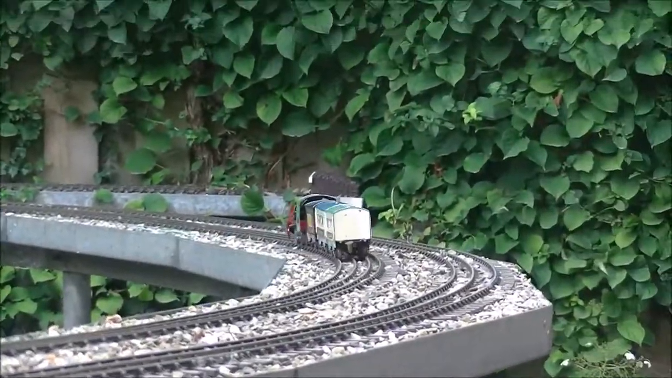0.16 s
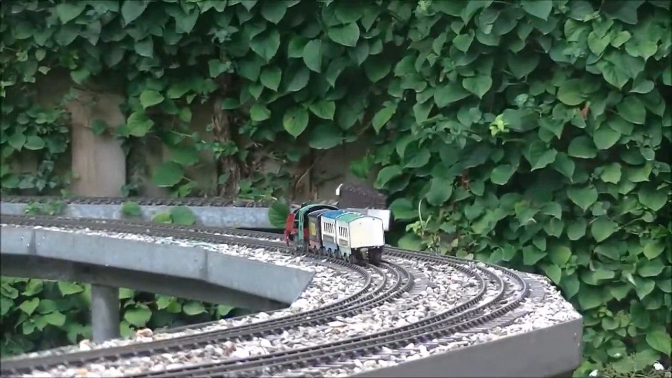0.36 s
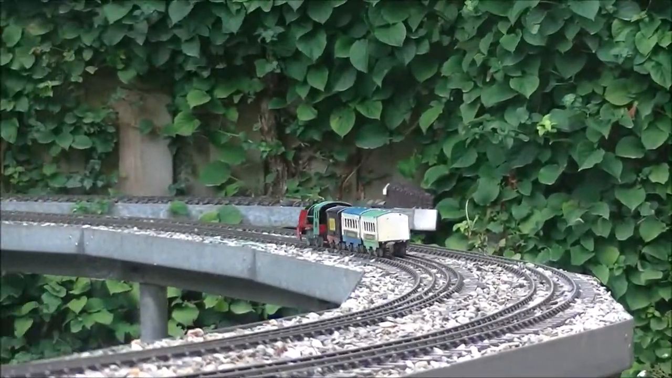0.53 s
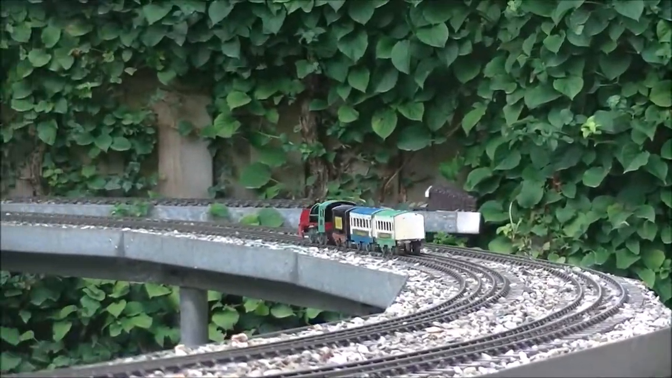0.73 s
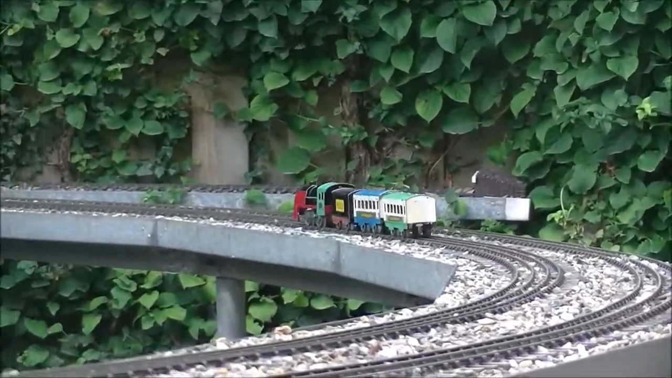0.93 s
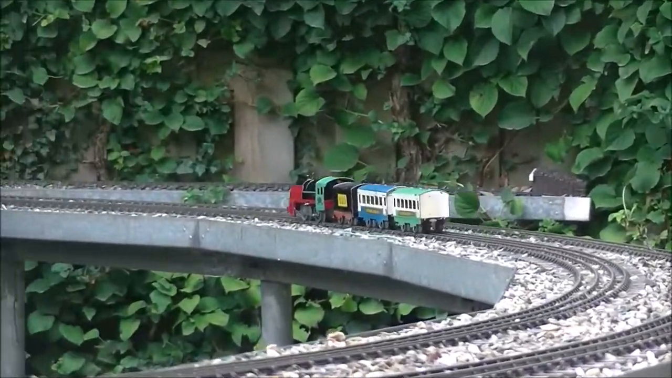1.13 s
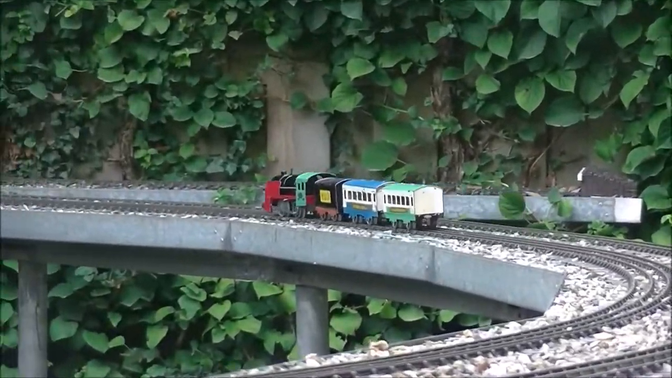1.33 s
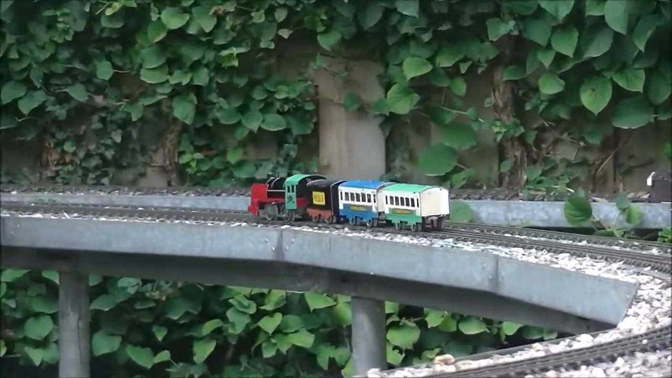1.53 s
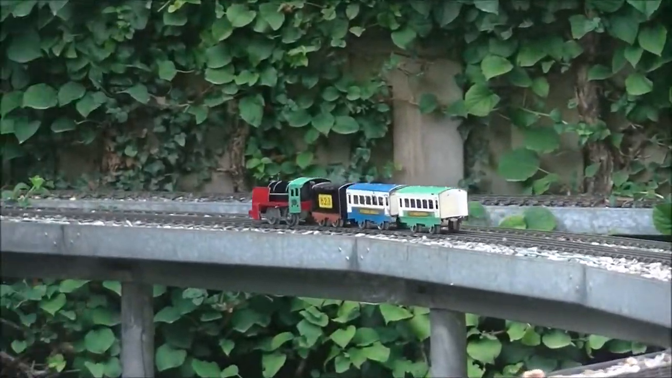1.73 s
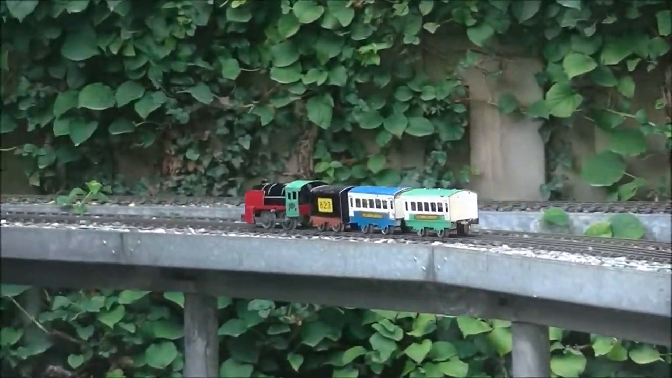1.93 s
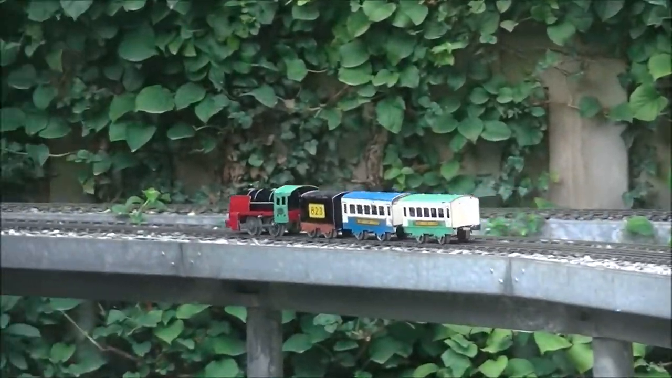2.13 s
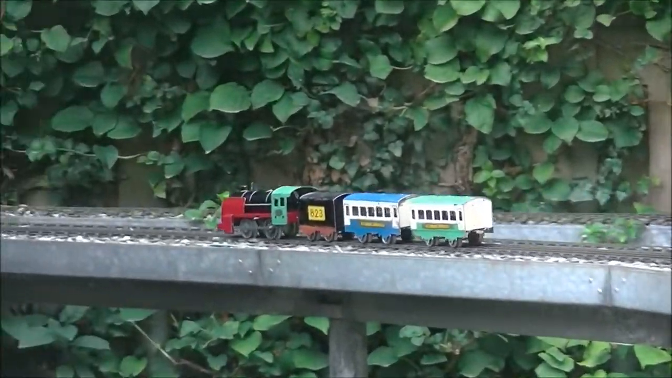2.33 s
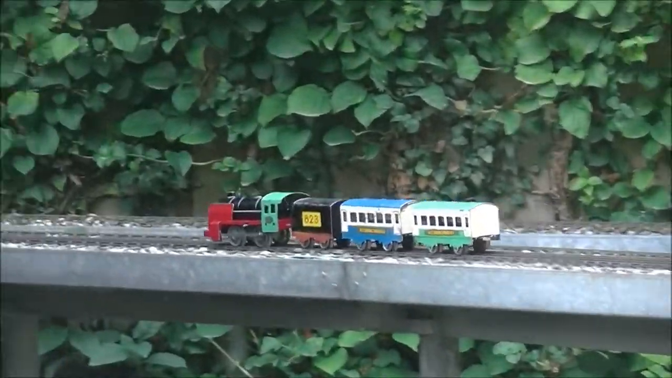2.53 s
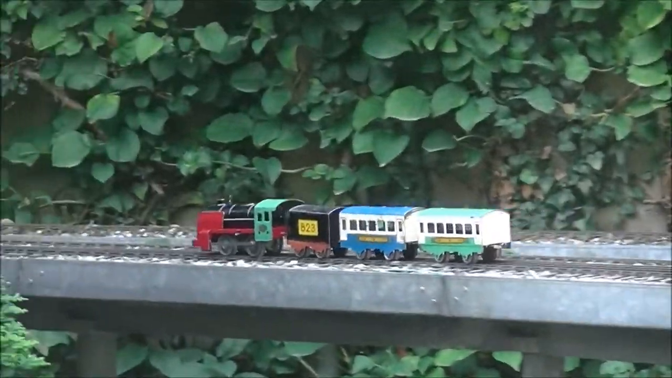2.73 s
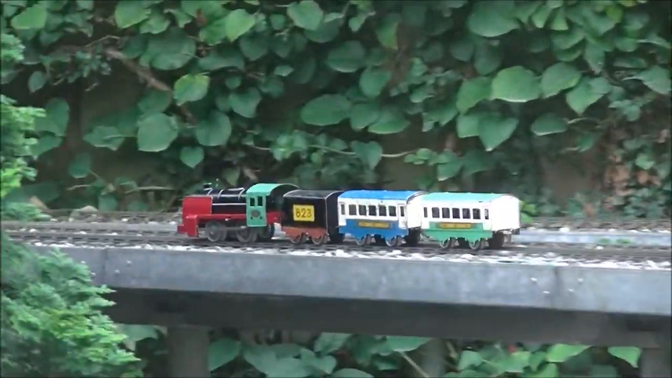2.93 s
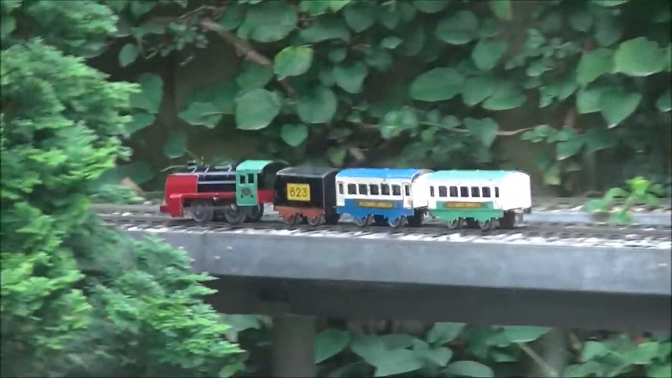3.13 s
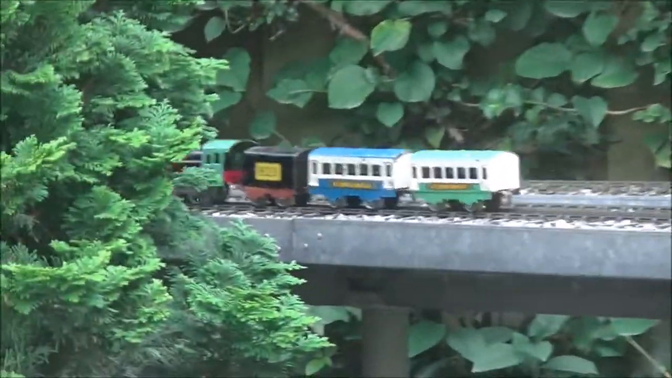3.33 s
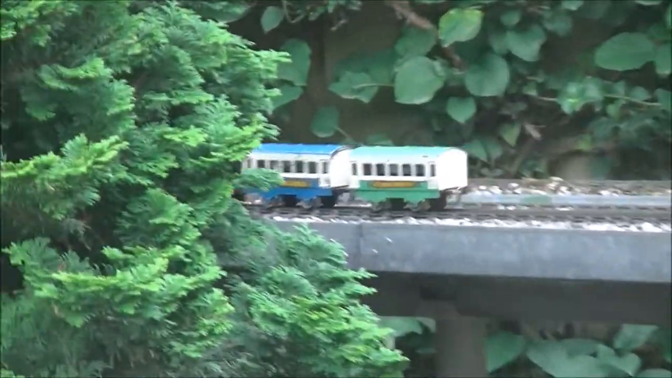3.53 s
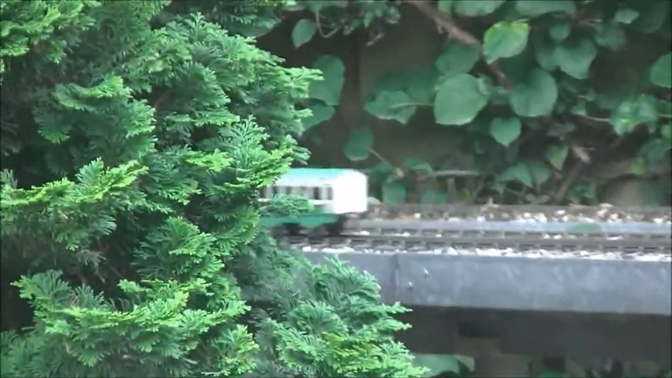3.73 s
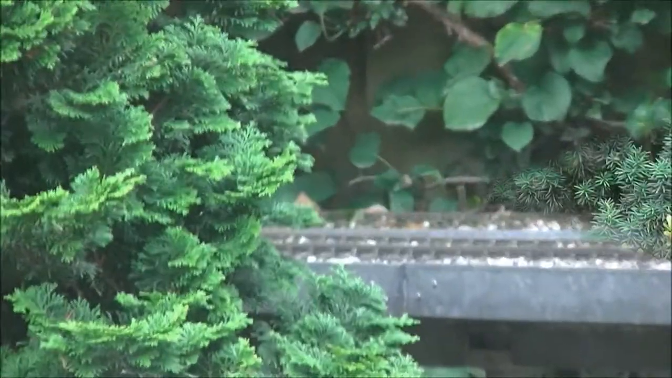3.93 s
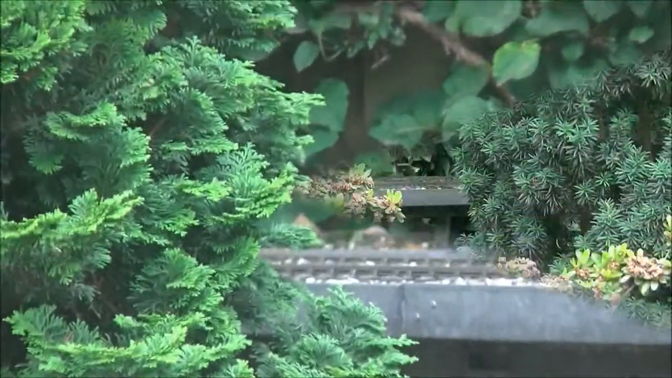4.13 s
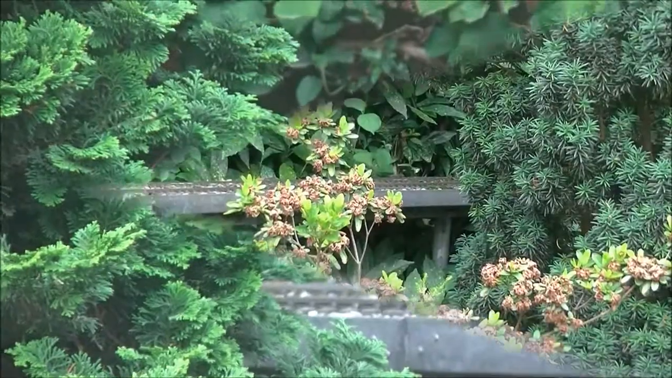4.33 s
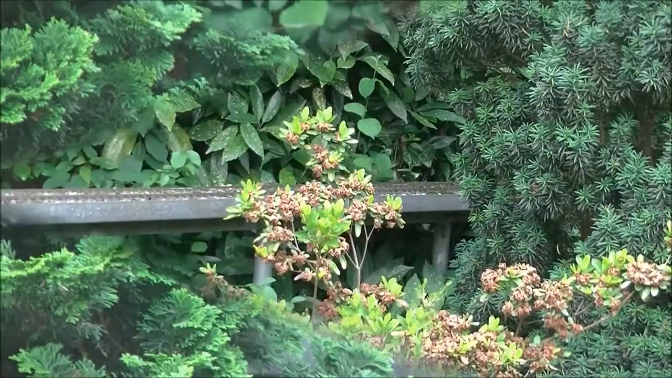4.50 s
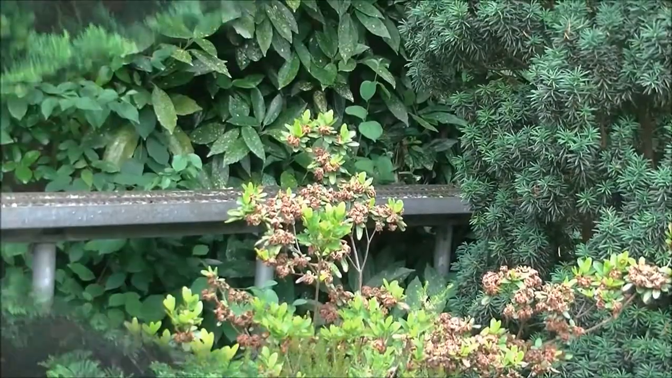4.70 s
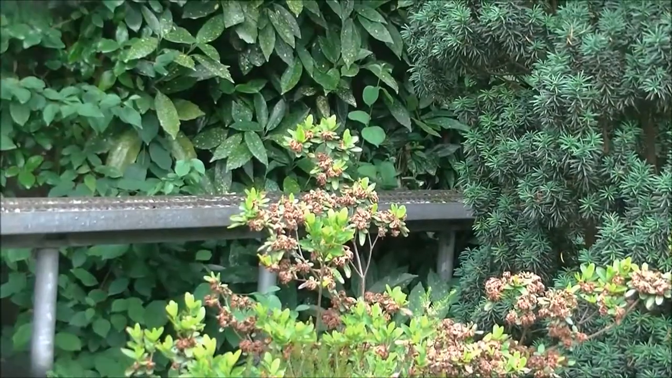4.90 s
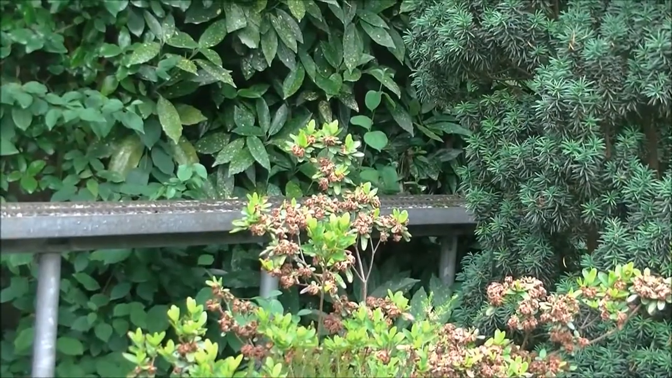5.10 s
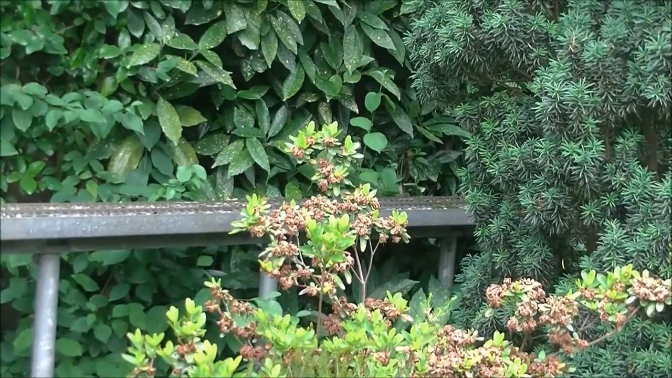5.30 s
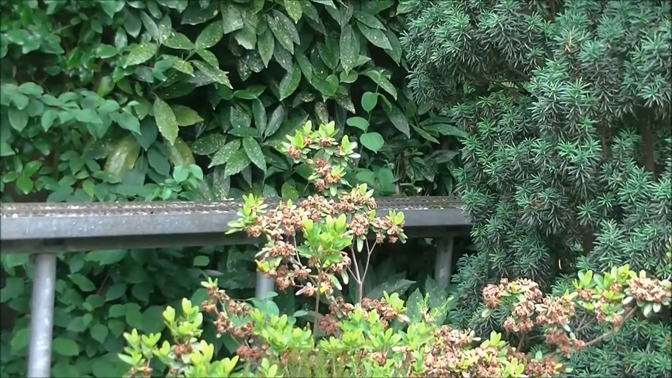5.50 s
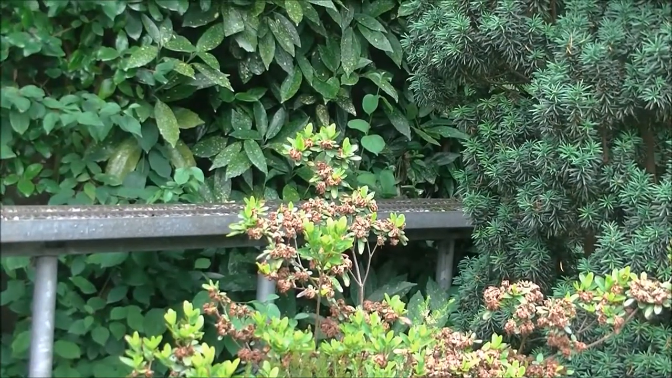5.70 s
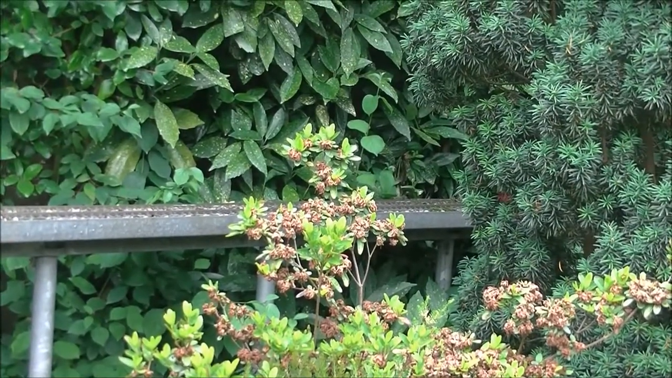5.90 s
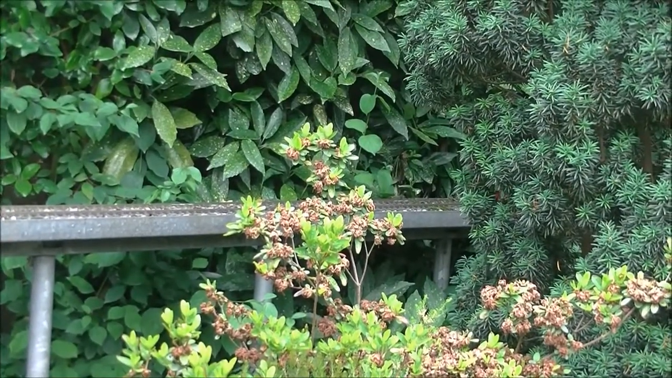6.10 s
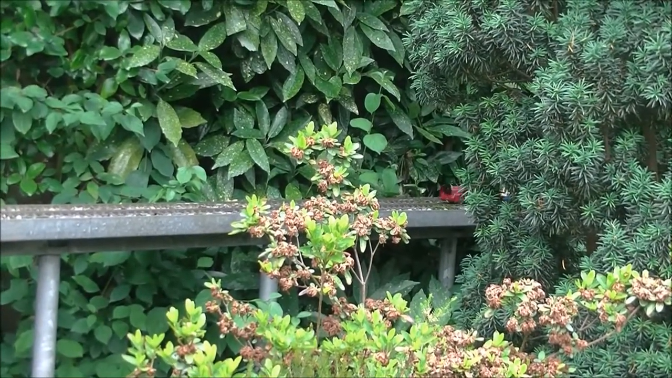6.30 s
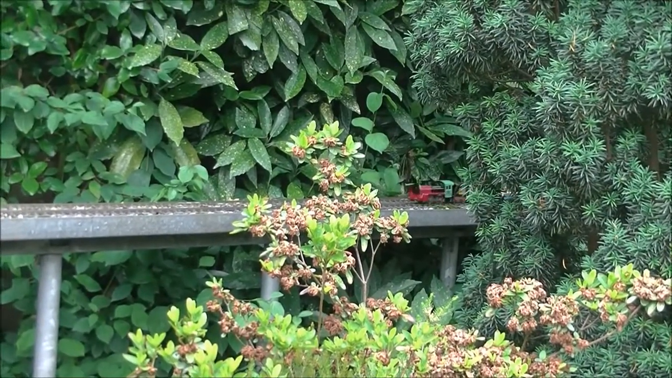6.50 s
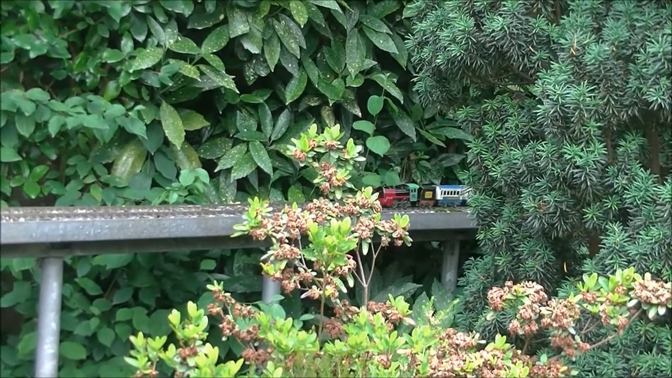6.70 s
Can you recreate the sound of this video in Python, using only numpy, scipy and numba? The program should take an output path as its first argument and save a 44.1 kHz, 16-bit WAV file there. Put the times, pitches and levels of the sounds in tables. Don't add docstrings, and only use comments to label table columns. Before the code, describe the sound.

From the start, a wind-up tin train rattles steadily a few metres away outdoors: a dense, sizzling metallic whirr of tiny gear and wheel contacts, with jingling loose parts and shifting tinny resonances as it turns. The rapid gear throb slows slightly while the level eases only a little. Wheels tick over rail joints, more clearly around 0.6, 1.6 and 3.1 seconds. A small handling knock comes near 3.8, and further ticks near 4.4 and 4.6. At about 4.75 the scene cuts abruptly: the train is much quieter, duller and slower behind shrubs. It swells gradually and its gears quicken; ticks cluster from 5.0 to 5.5, then a strong sharp click lands at 5.65, with smaller ones following. It is still approaching at the end, about 6.7. Beneath everything lie faint low traffic hum, air rumble, soft leaf rustle and barely audible dull hand thumps.

```python
import sys
import numpy as np
from scipy import signal
from scipy.fft import rfft, irfft, next_fast_len
from scipy.io import wavfile
from scipy.ndimage import uniform_filter1d
from numba import njit

SR = 44100
rng = np.random.default_rng(int(sys.argv[2]) if len(sys.argv) > 2 else 0)


def log_audio(samples):
    frames = np.atleast_2d(samples).T
    limited = np.clip(frames, -1, 1)
    pcm = np.round(limited * 32767).astype(np.int16)
    wavfile.write(sys.argv[1], SR, pcm)


def elevation(decibels):
    levels = np.asarray(decibels, float)
    return 10 ** (levels / 20)


N = 297675
T = np.arange(N) / SR
SIZE = next_fast_len(N + 4096)
HZ = np.arange(SIZE // 2 + 1) * SR / SIZE + 1e-3
CUT_S = 4.746

# time in seconds, level of the tin body in dB, brightness in dB.
RUN = [
    [(0, -38, -10.5), (.35, -38.5, -11.5), (.8, -40, -9.5), (1.3, -41, -9), (2, -41, -8.5), (2.6, -41, -7),
     (3.15, -41, -7), (3.55, -42.5, -8), (4.3, -42, -9), (4.76, -42, -10)],
    [(4.76, -53.5, -12.5), (4.95, -51.5, -12.5), (5.13, -49, -13.5), (5.4, -49, -13), (5.6, -46.5, -11),
     (5.85, -45, -10), (6.35, -43, -10.5), (6.75, -41.5, -10)],
]
# time in seconds, teeth per second in Hz.
GEAR_TEETH = [
    [(0, 149), (1.3, 141), (2.3, 130.5), (3, 132), (3.6, 124), (4.75, 118)],
    [(4.75, 76), (5.5, 87), (5.85, 98), (6.1, 104), (6.75, 106)],
]
ZONE_HZ = [3100, 6600, 10300]
# level against the body in dB, share of the brightness, gear tooth throb in dB.
ZONES = [
    [(-5, 0.019, 0.074), (0.5, 0.032, 0.24), (1.5, 1.06, 0.43), (-6.5, 1.06, 0.84)],
    [(-9, -0.31, .1), (1.5, -0.048, 0.27), (-0.5, 0.93, 0.72), (-5.5, 1, 1.3)],
]
# pitch in Hz, level in dB per Hz.
NEAR_COLOUR = [(290, -34), (500, -14.5), (1330, -8.5), (1490, -10), (1940, -4.5), (2110, -7), (2620, -5.5),
               (3120, -4.5), (3760, 1), (5010, 2), (5960, -0.5), (6880, -15.5), (7720, -11.5),
               (9050, -13.5), (15600, -26)]
HIDDEN_COLOUR = [(290, -49), (500, -26), (1430, -9.5), (1880, -8.5), (2110, -9.5), (2740, -6),
                 (3210, -16.5), (3500, -12.5), (4280, -13.5), (4870, -11.5), (6590, -21.5), (7950, -11.5),
                 (9590, -16.5), (12300, -14.5), (15600, -22)]
# pitch in Hz, level in dB per Hz.
NEAR_ECHO = [(350, -47), (600, -36), (1090, -40), (1440, -14.5), (1790, -16.5), (2660, -5.5), (2960, -6.5),
             (3350, -1.5), (4110, -7), (5550, 4.5), (7000, -5), (9450, -10), (10500, -15), (11800, -15),
             (15600, -16)]
HIDDEN_ECHO = [(350, -53), (600, -97), (1080, -82), (1480, -21), (1560, -16), (1910, -12), (2690, -13),
               (3090, -9.5), (4110, -21), (6020, -10.5), (7290, -11), (11000, -11), (12200, -14),
               (13700, -7), (15600, -23)]
ECHO_DB = [-9.5, -9.5]
# time in seconds, tick peak in dB, lift of the clatter that follows in dB.
JOINTS = [(0.2665, -31, 6), (0.598, -20, 2), (1.0864, -36, 0), (1.576, -17, -3), (1.8233, -31, 3.5),
          (2.2054, -26, 4), (3.1213, -19, 4), (3.2625, -23, -1), (3.3598, -30, -1), (4.4019, -29, 2),
          (4.5925, -30, -2), (4.6133, -29, 4), (5.012, -29, 5), (5.1173, -36, 4), (5.2175, -33, 6),
          (5.2634, -37, 4), (5.3612, -28, 3), (5.45, -18, -1), (5.4959, -22, 0), (5.6535, -6, 1),
          (5.675, -20, 5), (5.8022, -25, 8), (5.9708, -32, 1), (6.0477, -31, 0), (6.0963, -28, 4.5),
          (6.1275, -42.5, 3), (6.4497, -29, 1), (6.6427, -36, 5.5)]
# pitch in Hz,
# width in Hz, lift in dB, heading of a lobe in degrees, lobe spacing in degrees.
PANELS = [(770, 120, 4, 32, 96), (1203, 45, 9, 27, 49), (1340, 50, 8.5, 11, 48), (1592, 28, 11, 49, 54),
          (1700, 26, 8.5, -6, 100), (1890, 65, 6.5, 30, 50), (2010, 60, 4, 24, 48),
          (3720, 150, 3.9, 6, 76), (4050, 130, 3.4, -5, 52), (4000, 89, 1.3, 77, 79),
          (4860, 250, 4.5, 60, 160), (5190, 170, 5.1, -21, 162), (5800, 98, 1.9, 52, 57),
          (7600, 310, 5, -20, 140), (7850, 220, 3.1, 42, 130), (8970, 310, 3.8, 18, 81),
          (12150, 690, 6.5, 8, 120)]
ROOFS = [(2290, 60, 5, 21, 42), (2535, 75, 6, 44, 46), (2720, 90, 7, 43, 38)]
FRONT = [(830, 72, 4.1, 40, 14.3), (1633, 29, 8.5, 10, 27), (1650, 24, 8, -9, 78),
         (1923, 160, 9.5, 21, 200), (2720, 84, 3.2, 12, 22), (3830, 170, 2.2, 28, 110),
         (4890, 330, 5.8, 26, 150), (5350, 250, 3.9, 33, 92), (7900, 380, 3.4, 35, 100),
         (12100, 500, 3.4, 12, 83), (12000, 540, 5.1, 38, 60)]
# time in seconds, pitch in Hz, length in cycles, level in dB.
BUMPS = [(.67, 40, 1, -66), (1.13, 45, 1, -62), (1.85, 60, 1.5, -56), (3.63, 60, 1, -62),
         (3.7587, 1100, 1, -31), (3.7572, 2100, 0.97, -34), (3.759, 260, 0.51, -41),
         (3.851, 51.7, 1.5, -54), (4.14, 80, 0.81, -52), (4.57, 70, 1, -58), (5.6, 55, 1, -62)]
# pitch in Hz, level in dB per Hz.
TOWN = [(12, -43), (20, -17), (80, -5), (123, -3.5), (156, -3), (206, 0), (228, -1), (275, -1.5),
        (394, -4.5), (492, -8.5), (743, -18.5), (1200, -29), (1560, -14), (2640, -120)]
# start in seconds, end in seconds, pitch in Hz, pitch wander in Hz, level in dB.
DRONES = [(.08, .24, 209, 2, -63), (.5, 1.25, 210, 3, -62), (1.4, 2.05, 210, 4, -69),
          (.2, 1.35, 246, 7, -66), (1.65, 2.2, 257, 3, -66), (.8, 3.2, 150, 1.5, -70),
          (3.4, 4.3, 212, 4, -70)]
# pitch in Hz, width in Hz, left minus right share.
PORTS = [(3240, 890, -0.19), (5300, 1500, -0.1), (6450, 940, 0.29), (9800, 690, -0.25), (11900, 1500, -0.2),
         (14200, 1200, .15)]


def train():
    ticks, clatter_db = joints()
    direct = contacts(5500, 1.8, 1.0) + 0.37 * loose_parts(900, 0.13, 2.8) + ticks
    scattered = contacts(6000, 2.1, 1.5) + 0.41 * loose_parts(500, .05, 4.9)
    tin = rfft(body(np.array([direct, scattered])), SIZE)
    lurch = .5 * walk(5.9)
    wheel_turn = 2 * np.pi * np.cumsum(11 + 1.5 * walk(3)) / SR
    wobble = .3 * walk(20) + .45 * np.sin(wheel_turn)
    out = np.zeros((2, N))
    for view, (mid, echo) in enumerate([(NEAR_COLOUR, NEAR_ECHO), (HIDDEN_COLOUR, HIDDEN_ECHO)]):
        seen = (T >= CUT_S) == view
        teeth = gear(view)
        level_db, bright_db = curve(RUN[view:view + 1])
        coloured = tin * np.array([shape(mid), elevation(ECHO_DB[view]) * shape(echo)])
        below = 0
        for edge, (db, share, throb_db) in zip(ZONE_HZ + [SR], ZONES[view]):
            low = 1 / (1 + (HZ / edge) ** 16)
            zone = irfft(coloured * (low - below), SIZE)[:, :N]
            slow = np.sqrt(uniform_filter1d(zone[0] ** 2, SR // 7))
            flutter = 0.16 * walk(23.82) + 0.31 * walk(7.6)
            flutter += wobble + lurch + clatter_db + throb_db * teeth
            out += seen * zone / slow * elevation(level_db + db + share * bright_db + flutter)
            below = low
    return out


def contacts(per_s, scatter_db, bed):
    chance = rng.random((3, N))
    size_db = np.minimum(-scatter_db * np.log(chance[2] + 1e-9), 6.5)
    hits = (chance[0] < per_s / SR) * np.sign(chance[1] - .5) * elevation(size_db)
    return unit(unit(hits) + bed * rng.standard_normal(N))


def loose_parts(per_s, t60_s, scatter_db):
    chance = rng.random((int(per_s * N / SR), 4)).T
    start = (chance[0] * N).astype(np.int64)
    hz = 800 + 15000 * chance[1]
    ring_n = t60_s * (.5 + chance[2]) * SR
    pole = np.exp(2j * np.pi * hz / SR - np.log(1000) / ring_n)
    size = elevation(np.minimum(-scatter_db * np.log(chance[3] + 1e-9), 10))
    return unit(pings(start, (ring_n / 2).astype(np.int64), pole, size))


@njit
def pings(start, length, pole, size):
    out = np.zeros(N)
    for k in range(len(start)):
        z = size[k] + 0j
        for i in range(start[k], min(start[k] + length[k], N)):
            out[i] += z.imag
            z *= pole[k]
    return out


def joints():
    ticks, clatter_db = np.zeros(N), np.zeros(N)
    body_db = curve(RUN)[0]
    for s, db, lift_db in JOINTS:
        i = int(s * SR)
        ticks[i] = elevation(db - body_db[i] - 17.0)
        clatter_db[i] = lift_db
    click = [0.84, -0.28, 0.53, -0.37, -0.46, 0.72, 0.15]
    fade = np.exp(-1 / (0.005 * SR))
    return np.convolve(ticks, click)[:N], signal.lfilter([1], [1, -fade], clatter_db)


def body(force):
    sound = force.copy()
    share = np.array([[1], [.6]])
    cut = int(CUT_S * SR)
    roofs_hidden = int(3.2 * SR)
    groups = [(PANELS, slice(None, cut)), (ROOFS, slice(None, roofs_hidden)), (FRONT, slice(cut, N))]
    for panels, seen in groups:
        heading = 20 * (T[seen] - T[seen][0])
        for hz, width, db, lobe, spacing in panels:
            beam = np.clip(.5 + 1.3 * np.cos(2 * np.pi * (heading - lobe) / spacing), 0, 1)
            sway = elevation(1.4 * walk(14)[seen])
            ringing = signal.lfilter(*signal.iirpeak(hz, hz / width, SR), force[:, seen])
            sound[:, seen] += share * (elevation(db) - 1) * beam * sway * ringing
    return sound


def gear(view):
    teeth_hz = curve(GEAR_TEETH[view:view + 1])[0] * (1 + .005 * walk(3))
    turn = 2 * np.pi * np.cumsum(teeth_hz) / SR
    return (np.cos(turn) + .7 * np.cos(2 * turn)) * elevation(3 * walk(2))


def hand():
    out = np.zeros(N)
    for s, hz, cycles, db in BUMPS:
        near = slice(int((s - .1) * SR), int((s + .1) * SR))
        turn = (T[near] - s) * hz
        swell = np.exp(-(turn / (0.5 * cycles)) ** 2)
        out[near] += elevation(db) * swell * np.cos(2 * np.pi * turn + 1.5)
    return out


def leaves():
    rustle = unit(through(rng.standard_normal((2, N)), ring(885, 880) ** 2))
    level_db = np.where(T < CUT_S, -64, -70) + 0.96 * walk(5.5)
    return rustle * elevation(level_db + np.array([[0], [-15.5]]))


def traffic(bass):
    level_db = np.where(T < CUT_S, -59.5, -62.5) - 3 * window(T, -1, 0.5, 0.28)
    spread = np.array([HZ ** 0, elevation(-10.0) * (1 + HZ / 1500)])
    wash = through(rng.standard_normal((2, N)), shape(TOWN) * (1 - bass) * spread)
    return wash / np.std(wash[0]) * elevation(level_db - 1.0 + 1.3 * walk(9))


def air(bass):
    level_db = np.where(T < CUT_S, -75.5, -82.5) + 4.8 * window(T, 3.4, 6.2, .4) + 3.4 * walk(4.8)
    rumble = unit(through(rng.standard_normal(N), shape(TOWN) * bass))
    return rumble * elevation(level_db - 1.5 + 4.0 * walk(19))


def drones():
    out = np.zeros(N)
    for start, stop, hz, wander_hz, db in DRONES:
        tone = np.sin(2 * np.pi * np.cumsum(hz + wander_hz * walk(5.4)) / SR)
        out += window(T, start, stop, 0.045) * elevation(db + 3.8 * walk(14)) * tone
    return out


def town():
    bass = 1 / (1 + (HZ / 95) ** 4)
    mid, side = traffic(bass) + leaves()
    return np.array([mid + air(bass) + drones(), side])


def unit(x):
    return x / np.sqrt(np.mean(x ** 2))


def shape(points):
    hz, db = np.transpose(points)
    return elevation(np.interp(np.log(HZ), np.log(hz), db))


def ring(hz, width):
    return 1 / (1 + 1j * (HZ ** 2 - hz ** 2) / (HZ * width))


def through(x, gain):
    return irfft(rfft(x, SIZE) * gain, SIZE)[..., :N]


def walk(rate):
    held = np.repeat(rng.standard_normal(int(rate * N / SR) + 2), 8)
    slewed = uniform_filter1d(uniform_filter1d(held, 8), 8)
    return 1.3 * np.interp(T * rate * 8, np.arange(len(held)), slewed)


def curve(tables):
    s, *columns = np.vstack(tables).T
    return [np.interp(T, s, c) for c in columns]


def window(t, start, stop, ramp_s):
    return np.clip(np.minimum(t - start, stop - t) / ramp_s + .5, 0, 1)


def scene():
    mid, side = train() + town()
    mid = mid + hand()
    return np.array([mid + side, mid - side])


def band_limit(x):
    return signal.sosfilt(signal.butter(12, 15800, fs=SR, output="sos"), x)


def record(dry):
    tilt = sum(share * ring(hz, width) for hz, width, share in PORTS)
    lean = through(dry.mean(axis=0), tilt)
    mix = through(dry + np.array([lean, -lean]), HZ < 15745)
    return band_limit(mix)


dry = scene()
out = record(dry)
log_audio(out)
```